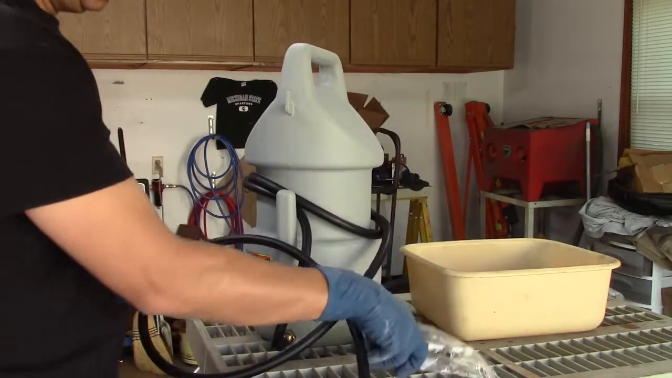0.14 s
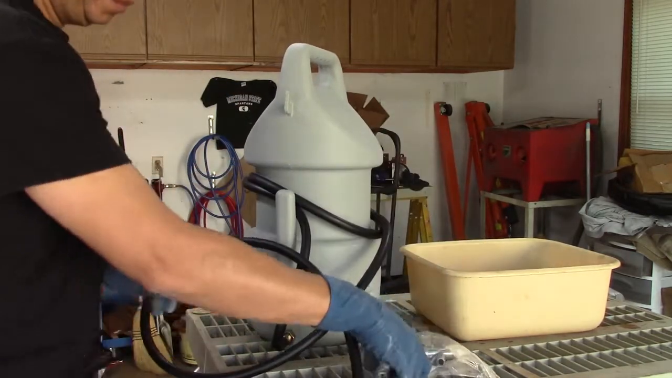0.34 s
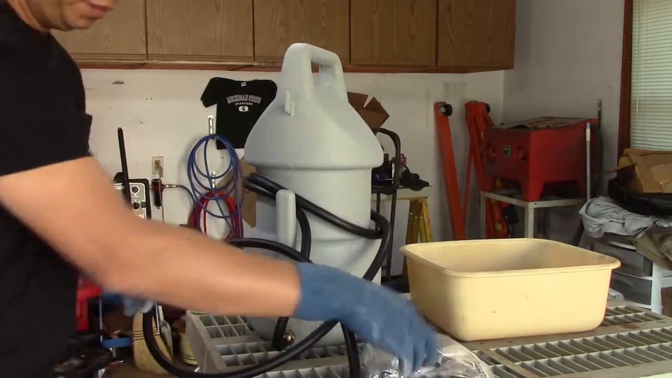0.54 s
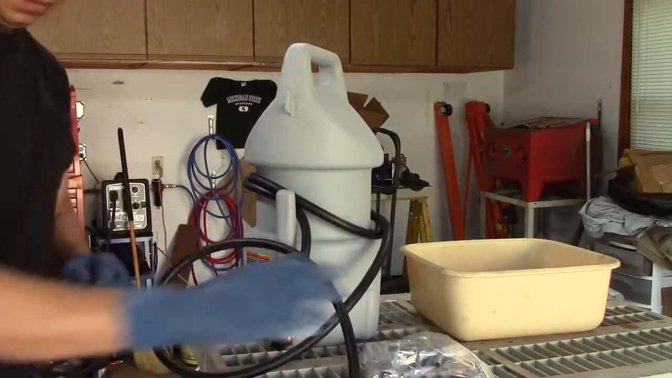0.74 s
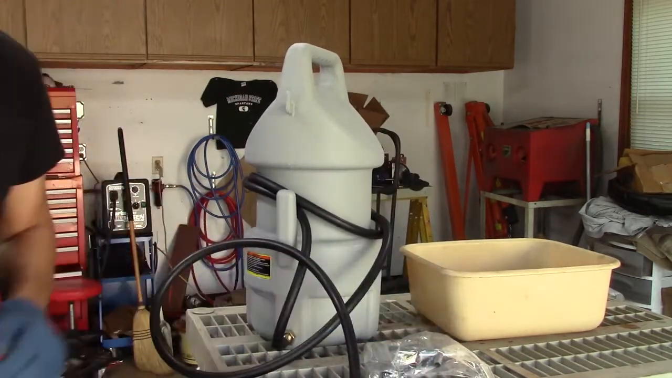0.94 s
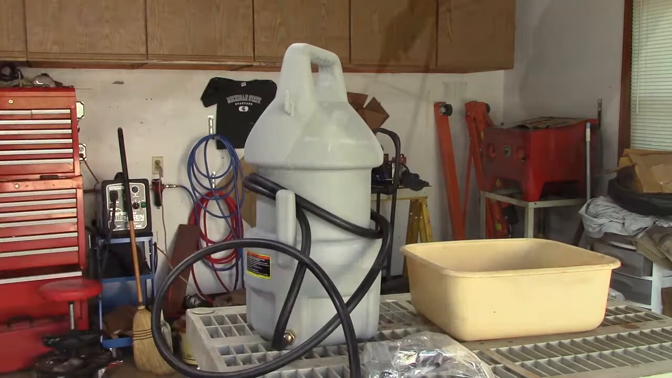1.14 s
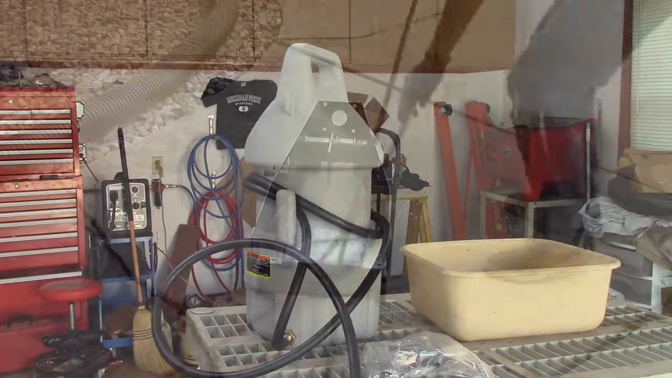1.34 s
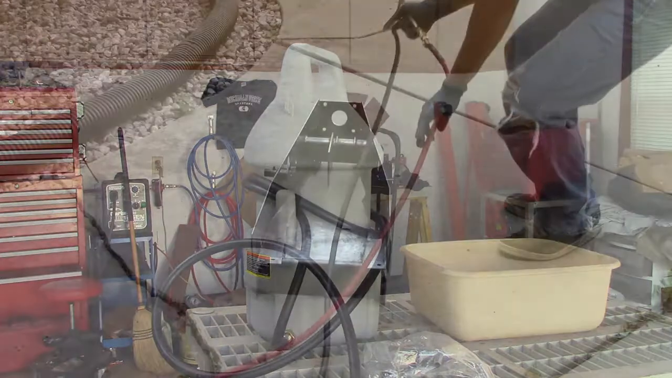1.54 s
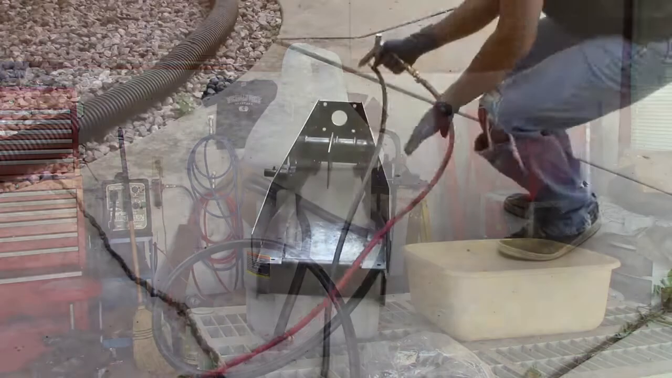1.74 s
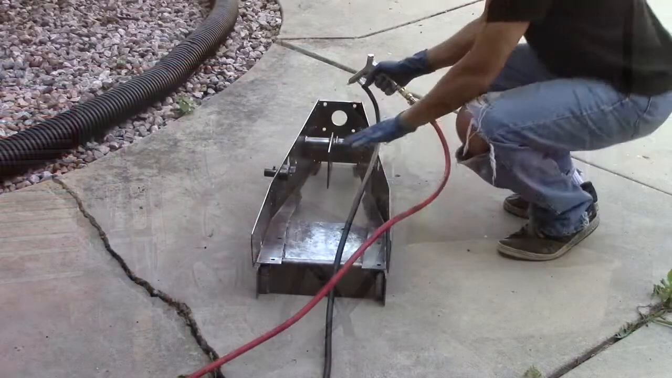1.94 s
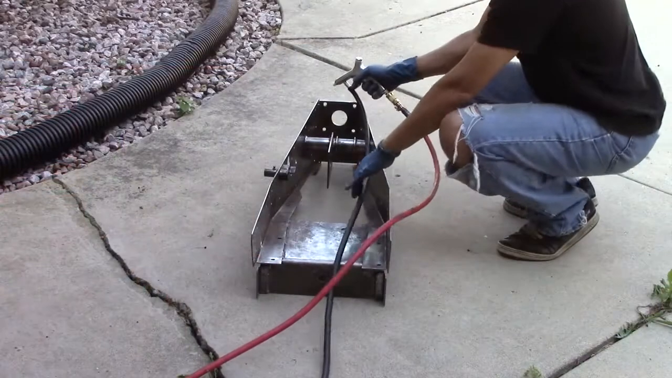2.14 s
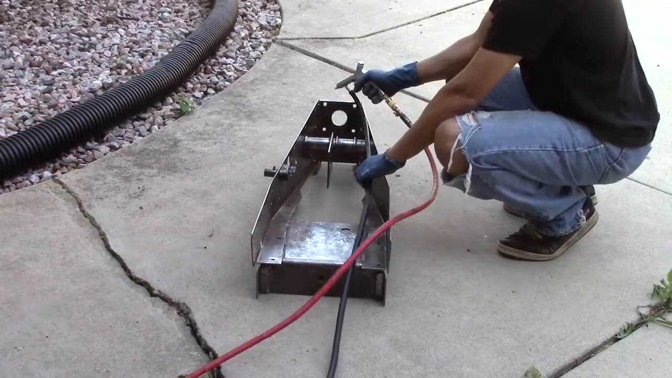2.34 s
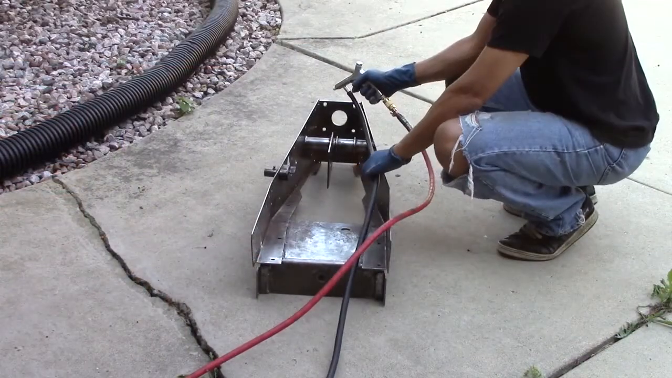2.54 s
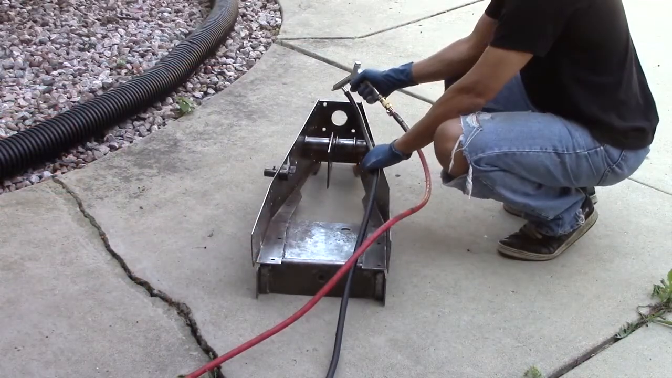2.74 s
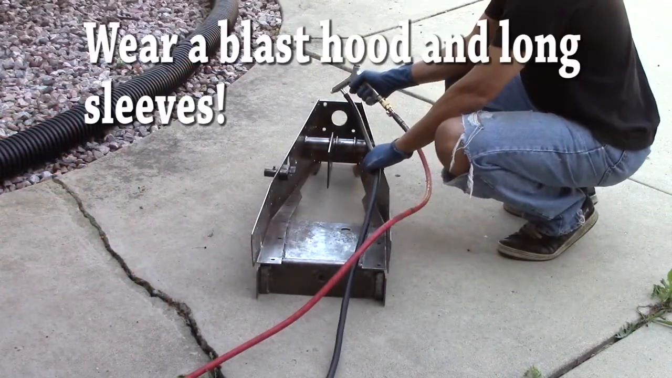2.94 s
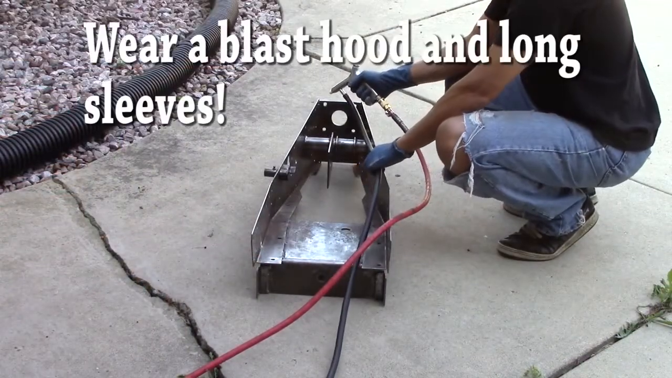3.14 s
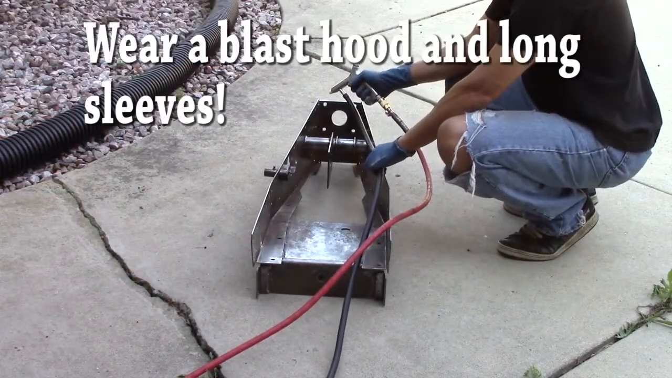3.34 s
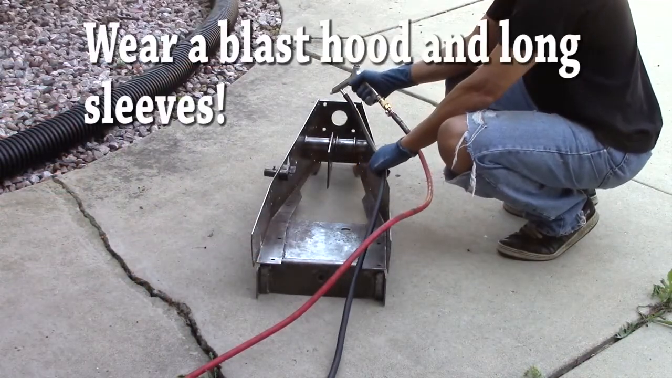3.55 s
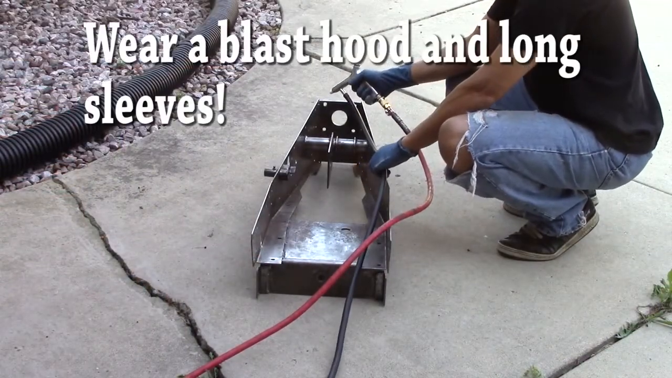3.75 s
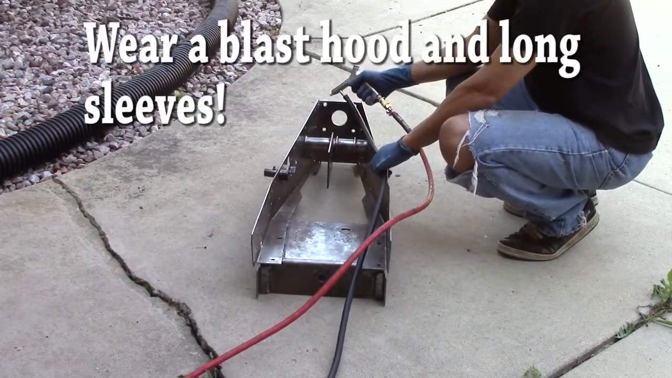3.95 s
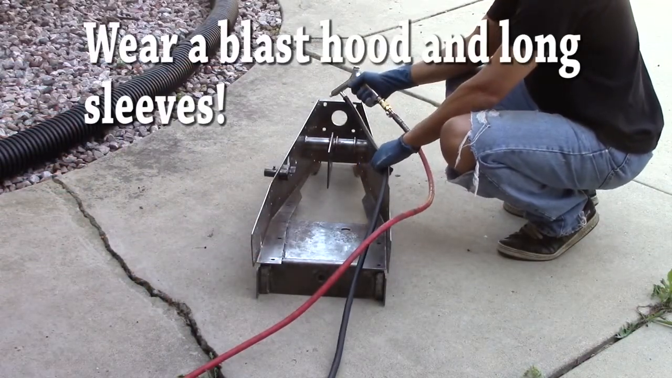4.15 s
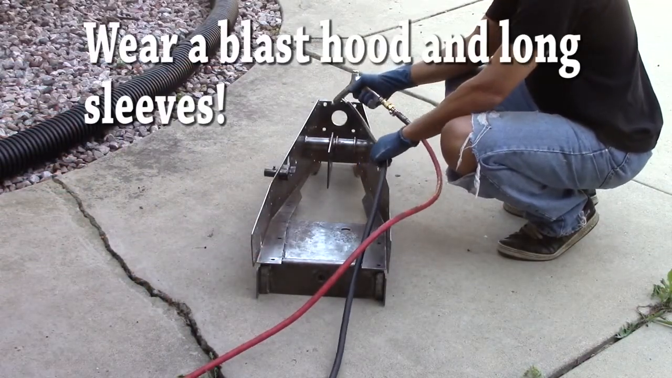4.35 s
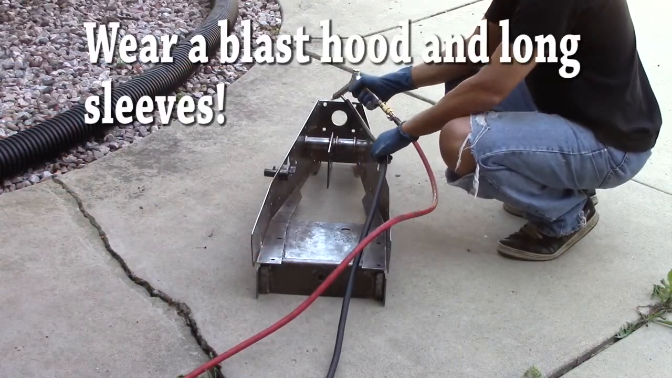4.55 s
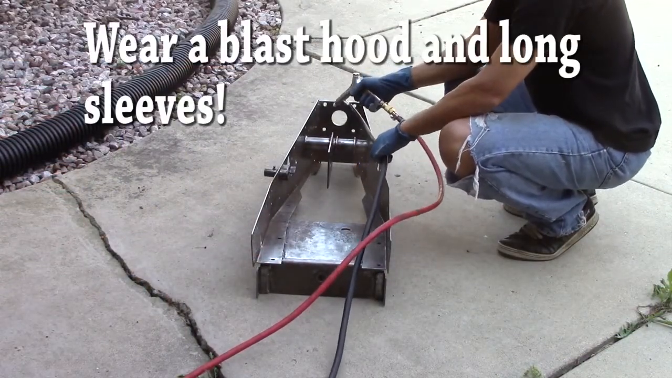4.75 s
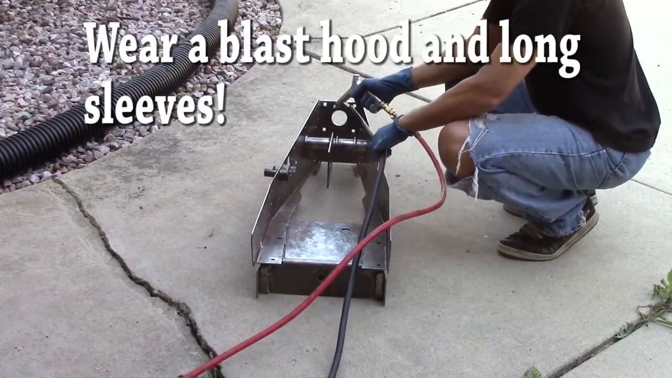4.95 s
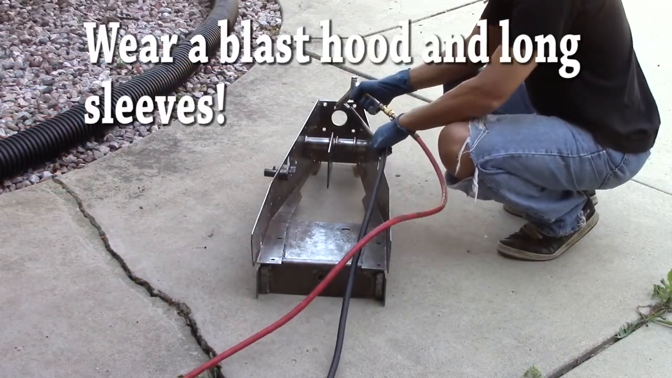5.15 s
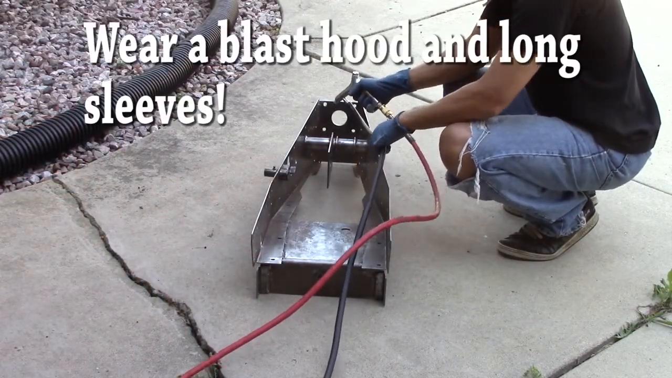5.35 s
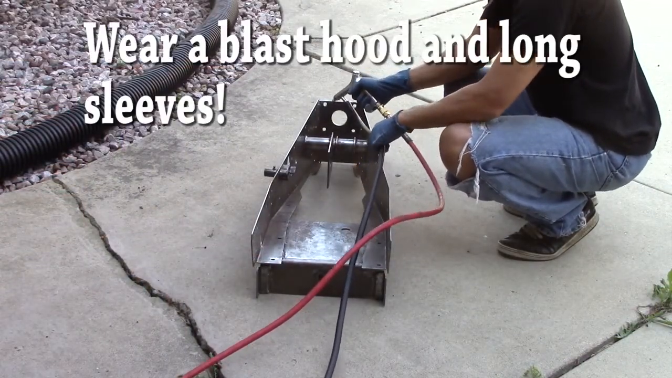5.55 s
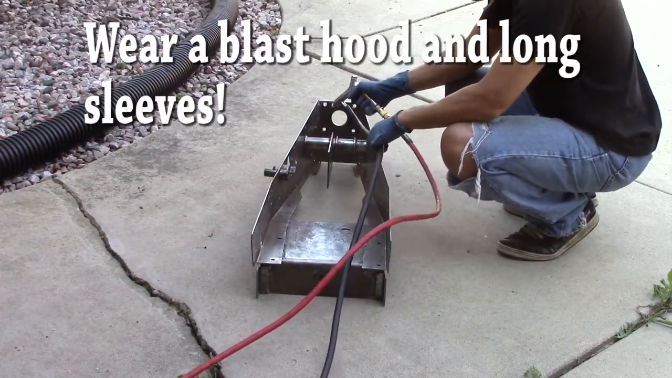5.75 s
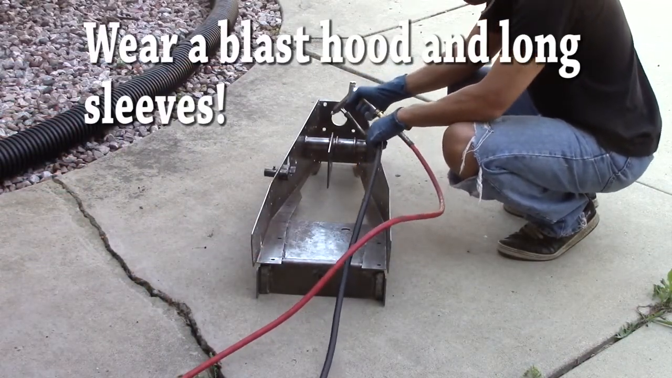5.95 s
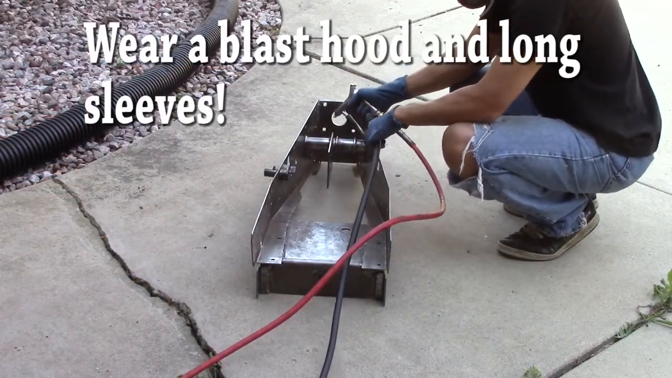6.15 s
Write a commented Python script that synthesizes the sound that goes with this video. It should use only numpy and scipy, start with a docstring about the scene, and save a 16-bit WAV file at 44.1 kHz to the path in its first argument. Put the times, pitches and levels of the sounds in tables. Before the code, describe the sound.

From 0 to 0.5 s, in a softly humming garage, a plastic bag crinkles with sharp snaps while the tool inside lands on a plastic grating: a cluster of hollow knocks at about 0.2-0.45 s, strongest near 0.27, with rattle, brief ringing and room echo. Tiny film ticks continue until about 1.4 s. Between 1.5 and 2.1 s the hum fades into quiet open air with a far motor and shrill throbbing insects. A scuff and light steel bumps ring at 1.5 s, with another clank at 2.2; a distant bird gives buzzy notes and falling pips from 1.7 to 2.8. At 3.05 s a sandblasting gun opens abruptly, loudest at first, then a strong bright hiss, dipping near 3.85. From 4 s to the end at 6.3, grit drums the steel into a rough roar beneath wandering, shrill, fluttering spray. The stereo image is nearly centred.

```python
"""A plastic bag crinkles in a humming garage and a tool in it knocks on a plastic grating: clicks set it ringing.
The room fades into a driveway with a far motor, insects and a bird, made from narrow noise and gliding sines.
A folded steel part is scuffed and bumped, so its modes ring; then a sandblasting gun opens with a hiss of noise.
As the jet sweeps over the part, the hiss gains wandering resonances and random grit clicks make the steel roar."""
import sys
import numpy as np
from scipy import signal
from scipy.fft import rfft, irfft, next_fast_len
from scipy.io import wavfile
from scipy.ndimage import map_coordinates

SR = 44100
rng = np.random.default_rng(int(sys.argv[2]) if len(sys.argv) > 2 else 0)


def materialize(psi):
    """Save the field psi as 16-bit PCM at rate SR to the path in sys.argv[1].

    A 1-D psi becomes a single channel; in a 2-D psi each row is a channel.
    """
    bounded = np.clip(np.atleast_2d(psi).T, -1, 1)
    quanta = np.round(bounded * 32767).astype(np.int16)
    wavfile.write(sys.argv[1], SR, quanta)


N = 277692
TIME = np.arange(N) / SR   # seconds

# Levels in the tables are relative: each function adds its own gain in dB.
# In spectra, level_db is the power in each Hz of pitch; only the shape counts.


def from_db(db):
    """Turn decibels into a plain multiplier."""
    return 10 ** (np.asarray(db) / 20)


def rms_one(x):
    """Scale a signal to an average strength (rms) of 1."""
    return x / np.sqrt(np.mean(x ** 2) + 1e-20)


def in_time(rows):
    """Join the points of a table with straight lines: each column at every sample."""
    times, *columns = np.transpose(rows)
    return [np.interp(TIME, times, column) for column in columns]


def coloured(x, spectrum):
    """Filter x to a spectrum with unit power gain, without sounding early (minimum phase)."""
    size = next_fast_len(len(x) + 4096)
    hz, db = np.transpose(spectrum)
    log_pitch = np.log(np.fft.rfftfreq(size, 1 / SR) + 1)
    gain = rms_one(from_db(np.interp(log_pitch, np.log(hz), db)))
    # folding the cepstrum forward in time gives the minimum phase
    cepstrum = irfft(np.log(gain), size)
    cepstrum[1:size // 2] *= 2
    cepstrum[size // 2 + 1:] = 0
    response = np.exp(rfft(cepstrum))
    return irfft(rfft(x, size) * response, size)[:len(x)]


def noise(spectrum):
    """Steady random noise with a given spectrum; rms 1."""
    return rms_one(coloured(rng.standard_normal(N), spectrum))


def low_pass(x, hz, order=2):
    """Keep the pitches below hz."""
    sections = signal.butter(order, min(hz, .45 * SR), fs=SR, output="sos")
    return signal.sosfilt(sections, x + 1e-18)


def high_pass(x, hz):
    """Keep the pitches above hz."""
    return signal.sosfilt(signal.butter(2, hz, "high", fs=SR, output="sos"), x + 1e-18)


def drift(hz):
    """Random wandering, mostly slower than hz; rms 1."""
    settled = low_pass(rng.standard_normal(N + SR), hz)[SR:]   # drop the filter's first second
    return rms_one(settled)


def resonance(hz, width_hz):
    """Turbulence ringing in one resonance, whose centre may move; rms 1."""
    phase = 2 * np.pi * np.cumsum(hz * np.ones(N)) / SR
    return rms_one(drift(width_hz / 2) * np.cos(phase) + drift(width_hz / 2) * np.sin(phase))


def ring(x, hz, t60):
    """Each unit click starts a sine of height 1 that dies by 60 dB in t60 seconds."""
    radius, angle = from_db(-60 / (t60 * SR)), 2 * np.pi * hz / SR
    return signal.lfilter([0, np.sin(angle)], [1, -2 * radius * np.cos(angle), radius * radius], x + 1e-18)


def grains(per_s, spread_db):
    """Random clicks of uneven size and either sign; rms 1."""
    sizes = from_db(spread_db * np.minimum(rng.exponential(1, N), 4))
    signed = sizes * rng.choice([-1, 1], N)
    return rms_one(signed * (rng.random(N) < per_s / SR))


def contacts(rows):
    """One short push for each blow; softer contacts are duller."""
    force = np.zeros(N)
    for start_s, level_db, brightness_hz in rows:
        at = int(start_s * SR)
        force[at:at + 512] += from_db(level_db) * low_pass(signal.unit_impulse(512), brightness_hz)
    return force


def tail(x, t60):
    """Spread x into a dense random tail that dies by 60 dB in t60 seconds; unit energy."""
    t = TIME[:SR]
    response = rng.standard_normal(SR) * from_db(-60 * t / t60)
    return signal.fftconvolve(x, response / np.linalg.norm(response))[:N]


def burst(start, length, attack, release):
    """Loudness shape: a quick rise that ends at start, a hold and an exponential release."""
    rise = np.clip((TIME - start) / attack + 1, 0, 1)
    return rise * np.exp(-np.maximum(TIME - start - length, 0) / release)


TRIGGER_S, VALVE_S = 3.051, .015   # the gun starts to open, and how long opening takes


def valve():
    """How far the gun is open, 0 to 1: slowly at first, then fast."""
    return np.clip((TIME - TRIGGER_S) / VALVE_S, 0, 1) ** 3


# spectrum of the garage air: pitch_hz, level_db
GARAGE_SPECTRUM = [(18, -38), (30, -29), (141, -1.5), (204, -6.5), (259, -2.5), (616, -13.5), (1040, -16.5),
                   (1130, -16.5), (1720, -19.5), (4420, -31), (4910, -35), (6380, -32.5), (6900, -36),
                   (7670, -31.5), (16000, -59)]
# spectrum of the open air: pitch_hz, level_db
OUTDOOR_SPECTRUM = [(30, -36), (70, -16.5), (120, -2.5), (290, -7.5), (560, -9.5), (1000, -12), (2600, -25),
                    (4400, -28), (6000, -30.5), (9000, -28), (10000, -40), (16000, -51)]
# hum of the garage: pitch_hz, width_hz, level_db
GARAGE_HUM_TONES = [(156, 10, -13.5), (258, 20, -12), (325.5, 10.7, -14)]
# a far motor, then two insect tones: pitch_hz, width_hz, level_db
MOTOR_AND_INSECTS = [(118, 17, -17), (3200, 120, -23.5), (6870, 220, -18.5)]
FADE_START_S, FADE_END_S = 1.51, 2.12   # the garage fades into the driveway
GARAGE_DB, OUTDOOR_DB = -36, -41
UNDER_BLAST_DB = -12.5   # the background sinks by this much once the gun opens


def background(insect_db=-22.5, throb_hz=3.2):
    """Garage hum gives way to open air with a far motor and shrilling insects, all random noise."""
    outside = np.interp(TIME, [FADE_START_S, FADE_END_S], [0, 1])
    garage = 0.63 * noise(GARAGE_SPECTRUM)
    garage += sum(from_db(db) * resonance(hz, width) for hz, width, db in GARAGE_HUM_TONES)
    outdoors = 0.6 * noise(OUTDOOR_SPECTRUM)
    outdoors += sum(from_db(db) * resonance(hz, width) for hz, width, db in MOTOR_AND_INSECTS)
    throb = 1 + 0.42 * np.cos(2 * np.pi * throb_hz * (TIME - 2.87))
    insects = from_db(insect_db) * resonance(8600, 550) * throb
    outdoor_level = from_db(OUTDOOR_DB + UNDER_BLAST_DB * valve())
    return (1 - outside) * from_db(GARAGE_DB) * garage + np.sqrt(outside) * outdoor_level * (outdoors + insects)


# the bag is gripped, pressed down and settles: start_s, length_s, level_db
BAG_RUSTLES = [(0.008, 0.031, -57), (0.148, 0.058, -52), (0.2, 0.074, -47), (0.306, 0.061, -48),
               (.395, 0.055, -48), (1.108, .1, -64), (1.378, .02, -56.5)]
# sharp snaps of the film: start_s, level_db
BAG_SNAPS = [(0.0144, -31), (0.1471, -26), (0.1825, -24), (0.3977, -24), (0.4532, -19), (0.4934, -27),
             (0.7896, -31), (0.9213, -31), (1.0375, -33)]
# spectrum of the plastic film: pitch_hz, level_db
BAG_SPECTRUM = [(800, -5), (2500, 9), (4500, 2.5), (6700, 5), (10000, 0.5), (15500, -12)]
RUSTLE_ATTACK_S, RUSTLE_RELEASE_S = .006, 0.034


def bag(crinkle_db=3.0, snap_db=0.0):
    """Creases of plastic film buckle: fine crinkle and a few sharp snaps."""
    handling = sum(from_db(db + crinkle_db) * burst(start, length, RUSTLE_ATTACK_S, RUSTLE_RELEASE_S)
                   for start, length, db in BAG_RUSTLES)
    crinkle = grains(per_s=1300, spread_db=2.5) * handling
    snaps = from_db(snap_db) * contacts([(start, db, 14000) for start, db in BAG_SNAPS])
    film = coloured(crinkle + snaps + 1.7 * tail(snaps, t60=0.028), BAG_SPECTRUM)
    return film + .5 * tail(film, t60=0.23)


# the tool landing on the grating: start_s, level_db, brightness_hz of the contact
TOOL_KNOCKS = [(.2090, -13.5, 7000), (.2135, -22.5, 7000), (.231, -21.5, 5000), (.2692, -8, 1160),
               (.2695, -21, 6000), (.294, -17.5, 2020), (.316, -22, 900), (.336, -38, 800),
               (.400, -36, 7000), (.425, -26, 4000)]
# spectrum of the knocks: pitch_hz, level_db
KNOCK_SPECTRUM = [(35, -48), (90, -36), (170, -2), (440, 3), (850, 4), (1400, 0.5), (1950, -4.5),
                  (2600, -13), (4200, -9.5), (5900, -4), (7200, -17), (15000, -25)]
# ringing modes of the grating: pitch_hz, level_db, ring_s to die by 60 dB (before a cap of 0.6 s)
GRATING_MODES = [(167, 5.5, 0.3), (284.4, -8, 2.2), (473, -8, 1.1), (556, -9, 0.68), (656, -22, 0.33),
                 (726, -9, 0.29), (726, -18, 0.59), (818, -21, 0.38), (893, -28, 0.41), (1110, -11, 0.11),
                 (1174, -22, 0.66), (1440, -19, 0.23), (1700, -30, 0.31), (1660, -27, 0.97)]
DIRECT_DB = 11.5


def tool_set_down(rattle_db=21.0, modes_db=-15.0, room_db=23.5):
    """The tool lands and rocks; the bars rattle, the grating rings and the garage answers."""
    force = contacts(TOOL_KNOCKS)
    crack = coloured(force, KNOCK_SPECTRUM)
    rattle = from_db(rattle_db) * tail(crack, t60=0.038)
    modes = sum(from_db(db) * ring(force, hz, min(ring_s, .6)) for hz, db, ring_s in GRATING_MODES)
    body = from_db(modes_db) * high_pass(modes, hz=113)   # an open grating radiates little bass
    garage = from_db(room_db) * low_pass(tail(crack, t60=.48), 3500, order=1)
    return from_db(DIRECT_DB) * crack + rattle + body + garage


# spectrum of the scuff: pitch_hz, level_db
SCUFF_SPECTRUM = [(800, -6), (2500, 5), (4500, 3), (7000, 1), (11000, 0), (15500, -5)]
SCUFF_S, SCUFF_LENGTH_S, SCUFF_DB = 1.516, 0.03, -45


def scuff():
    """The first bump drags briefly over the steel: a burst of gritty clicks."""
    slide = burst(SCUFF_S, SCUFF_LENGTH_S, attack=.012, release=.008)
    return from_db(SCUFF_DB) * coloured(grains(per_s=5000, spread_db=2.5) * slide, SCUFF_SPECTRUM)


# bumps: start_s, level_db, brightness_hz of the clatter, favoured_hz (pitch the struck spot favours)
STEEL_BUMPS = [(1.509, -39, 3000, 700), (1.527, -38, 3400, 700), (1.545, -42, 3400, 470),
               (1.785, -50, 600, 600), (2.215, -36, 2600, 1080)]
# spectrum of the clatter: pitch_hz, level_db
CLATTER_SPECTRUM = [(150, -21), (450, -6), (750, 1), (1300, 1), (2400, -1), (4000, -2), (7000, -29)]
# ringing modes of the part, also played by the grit:
# pitch_hz, grit_level_db, bump_level_db, ring_s to die by 60 dB when bumped
STEEL_MODES = [(420.0, -7.0, -20, 0.6), (463.0, -12.0, -10, 1.3), (543.0, -3.0, -7, 1.9),
               (564.0, -1.0, -18, 0.6), (614.0, -4.0, -9, 0.8), (652.0, -3.0, -12, 0.5),
               (762.0, -1.0, -6, 0.9), (795.0, -1.0, -10, 0.6), (847.0, 0.0, -16, 0.5),
               (892.0, -3.0, -15, 0.4), (915.0, -3.0, -13, 1.3), (957.0, -1.0, -23, 0.5),
               (1082.0, -4.0, -11, 0.7), (1114.0, -2.0, -7, 1.1), (1192.0, -6.0, -13, 0.9),
               (1275.0, -2.0, -21, 0.4), (1343.0, -3.0, -17, 0.7), (1437.0, -2.0, -24, 0.4),
               (1507.0, -1.0, -26, 0.4), (1561.0, -2.0, -16, 0.4), (1595.0, -1.0, -14, 0.6),
               (1675.0, -3.0, -20, 0.4), (1846.0, -2.0, -21, 0.4), (1992.0, -10.0, -19, 0.5),
               (2120.0, -8.0, -32, 0.4), (2281.0, -4.0, -23, 0.4), (2342.0, -7.0, -13, 0.45),
               (2412.0, -6.0, -23, 0.35), (2595.0, -5.0, -21, 0.35), (2848.0, -5.0, -21, 0.3)]
CLATTER_DB, CLATTER_T60_S, BUMP_MODES_DB = 28.5, .5, 2
SPOT_DB_PER_OCTAVE = 2   # modes lose this much per octave away from the favoured pitch


def steel_bumps():
    """Light knocks leave the steel ringing: clear low modes over a wash of crowded ones."""
    knocks = contacts([row[:3] for row in STEEL_BUMPS])
    clatter = tail(coloured(knocks, CLATTER_SPECTRUM), t60=CLATTER_T60_S)
    times, blow_db, _, favoured_hz = np.transpose(STEEL_BUMPS)
    modes = np.zeros(N)
    for hz, _, db, ring_s in STEEL_MODES:
        # each blow lands on another spot, so it drives each mode with its own strength and sign
        octaves_away = np.abs(np.log2(hz / favoured_hz))
        spot_db = rng.normal(0, 2.2, len(times)) - SPOT_DB_PER_OCTAVE * octaves_away
        signs = rng.choice([-1, 1], len(times))
        force = np.zeros(N)
        force[(times * SR).astype(int)] = signs * from_db(blow_db + db + spot_db)
        modes += ring(force, hz, ring_s)
    return from_db(BUMP_MODES_DB) * modes + from_db(CLATTER_DB) * clatter


def note(start, length, hz, glide_hz, vibrato_hz):
    """One whistle that swells and fades while its pitch glides by glide_hz in all."""
    progress = np.clip((TIME - start) / length, 0, 1)
    pitch_hz = hz + glide_hz * (progress - .5) + vibrato_hz
    return np.sin(np.pi * progress) * np.sin(2 * np.pi * np.cumsum(pitch_hz) / SR)


# the long buzzy notes: start_s, length_s, level_db
BUZZY_NOTES = [(1.705, 0.316, -51), (2.426, 0.307, -51)]
# groups of three pips: start_s, level_db
PIP_TRIPLETS = [(1.877, -53), (2.265, -51.5), (2.673, -50.5)]
# the pips of every triplet: delay_s, pitch_hz, level_db
TRIPLET_PIPS = [(0, 4870, -5), (.029, 4970, 3), (.070, 5000, 3)]
BUZZ_HZ, BUZZ_RISE_HZ = 4050, 78.5
PIP_S, PIP_FALL_HZ = 0.023, 280


def bird(buzz_hz=72.0, swing_hz=110.0, waver_db=2.5, echo=0.71):
    """A distant bird: buzzy notes and triplets of falling pips, blurred by the yard."""
    buzz = np.sin(2 * np.pi * np.cumsum(buzz_hz * (1 + 0.258 * drift(32.7))) / SR)
    waver = from_db(waver_db * drift(40)) * (1 + .5 * buzz)
    song = waver * sum(from_db(db) * note(start, length, BUZZ_HZ, BUZZ_RISE_HZ, swing_hz * buzz)
                       for start, length, db in BUZZY_NOTES)
    song += sum(from_db(db + pip_db) * note(start + delay, PIP_S, hz, -PIP_FALL_HZ, 0)
                for start, db in PIP_TRIPLETS for delay, hz, pip_db in TRIPLET_PIPS)
    return song + echo * tail(song, t60=0.44)


# spectrum of the free jet: pitch_hz, level_db
JET_SPECTRUM = [(50, -45), (150, -37), (300, -16.5), (600, -9), (1030, -22), (1600, -14), (2100, -2),
                (3200, -1.5), (4300, -1.5), (7000, 2), (9300, 3.5), (10200, -2), (12200, 0), (14300, -12.5),
                (15700, -15)]
# resonances of the gun and its nozzle: pitch_hz, width_hz, level_db
NOZZLE_RESONANCES = [(1343, 160, -18), (1995, 330, -9), (2270, 110, -9.5), (2883, 440, -6.5),
                     (3158, 310, -5.5), (3544, 330, -3), (4000, 160, -11), (4425, 270, -8.5),
                     (5195, 260, -9), (5830, 390, -14), (6910, 250, -12.5), (7140, 280, -24),
                     (8910, 1000, 1.5), (9550, 140, -7.5), (10980, 780, -5), (12400, 330, -23),
                     (13100, 370, -11)]


def free_jet(hiss_db=5.5, nozzle_db=-1.0):
    """Turbulent air, coloured by the resonances of the gun."""
    hiss = from_db(hiss_db) * noise(JET_SPECTRUM)
    nozzle = sum(from_db(db) * resonance(hz, width) for hz, width, db in NOZZLE_RESONANCES)
    return hiss + from_db(nozzle_db) * nozzle


# spectrum of the broad roar: pitch_hz, level_db
ROAR_SPECTRUM = [(20, -46), (40, -49), (150, -18.5), (300, -9.5), (560, 2.5), (690, 0), (820, -0.5),
                 (1040, 0), (1600, 2.5), (1950, -2.5), (2800, -2), (3500, -7.5), (7000, -11.5)]
GRIT_DAMPING = .45   # under grit, the modes ring for this share of their ring_s


def grit_on_steel(modes_db=-3.0, roar_db=0.0):
    """Thousands of grains a second drum on the part, whose modes stand out of a broad roar."""
    modes = sum(from_db(db) * rms_one(ring(grains(per_s=6000, spread_db=3.0), hz, GRIT_DAMPING * ring_s))
                for hz, db, _, ring_s in STEEL_MODES)
    radiated = rms_one(high_pass(modes, hz=260))   # the ringing modes are kept above 260 Hz
    roar = coloured(grains(per_s=14000, spread_db=3.5), ROAR_SPECTRUM)
    return from_db(modes_db) * radiated + from_db(roar_db) * roar


# main resonance of the air gap between nozzle and steel, lower as the gap opens: time_s, pitch_hz
GAP_PITCH_CURVE = [(4.0, 8890), (4.24, 8480), (4.33, 8110), (5.19, 8990), (5.29, 8230), (5.46, 8710),
                   (5.69, 8340), (6.13, 9180), (6.3, 8200)]
# the whistling upper resonance: time_s, level_db
WHISTLE_CURVE = [(4.1, -29), (4.28, -25), (4.31, -18.5), (4.57, -22.5), (4.76, -20.5), (4.93, -32),
                 (5.48, -20.5), (5.59, -25), (5.78, -21), (5.81, -27), (6.3, -30)]
# the shrill top, which a rasp in the middle follows: time_s, level_db
SHRILL_CURVE = [(4.0, -28), (4.08, -30), (4.22, -21.5), (4.38, -31), (4.43, -34), (4.57, -45),
                (4.67, -29.5), (5.25, -24.5), (5.34, -46), (5.51, -25), (5.62, -37), (5.85, -19),
                (6.03, -27), (6.3, -31)]
WHISTLE_HZ, SHRILL_HZ, RASP_HZ = 11060, 13450, 2332


def gap_tones(hiss_db, main_db=-4.0, whistle_db=-1.0, shrill_db=-0.5, rasp_db=-3.0, wander_hz=131.2):
    """Broad resonances that wander and swell as the nozzle moves along the steel."""
    (gap_hz,) = in_time(GAP_PITCH_CURVE)
    (whistle_level,) = in_time(WHISTLE_CURVE)
    (shrill_level,) = in_time(SHRILL_CURVE)
    wander = wander_hz * drift(3)
    main = from_db(hiss_db + main_db) * resonance(gap_hz, 1330)
    whistle = from_db(whistle_level + whistle_db) * resonance(WHISTLE_HZ + wander, 820)
    shrill = from_db(shrill_db) * resonance(SHRILL_HZ + wander, 750)
    rasp = from_db(rasp_db) * resonance(RASP_HZ, 840)
    return main + whistle + from_db(shrill_level) * (shrill + rasp)


# the bounce off the concrete shifts as the hand sways
GROUND_ECHO_S, ECHO_SWAY_S, SWAY_HZ, GROUND_SHARE = .0011, .00012, 1.43, 0.26


def over_concrete(x):
    """Direct sound plus one ground bounce: a comb of peaks that sweeps as the nozzle sways."""
    lag = (GROUND_ECHO_S + ECHO_SWAY_S * drift(SWAY_HZ)) * SR   # in samples
    bounce = map_coordinates(x, [np.arange(N) - lag], order=3)
    return (x + GROUND_SHARE * bounce) / np.hypot(1, GROUND_SHARE)


# the hiss, which changes as the gun is turned: time_s, level_db
HISS_CURVE = [(3.1, -13), (3.12, -13.5), (3.41, -14), (3.85, -19.5), (4.2, -14.5), (4.3, -14), (4.92, -13),
              (5.13, -14.5), (5.16, -15.5), (5.89, -16), (6.29, -19.5), (6.3, -19)]
# the grit striking the steel: time_s, level_db
GRIT_CURVE = [(3.1, -36.5), (3.59, -30.5), (3.88, -33), (4.03, -23), (4.37, -20.5), (4.44, -22),
              (4.98, -18.5), (5.7, -21), (6.3, -18.5)]
# spectrum of the spray thrown off the steel: pitch_hz, level_db
SPRAY_SPECTRUM = [(1500, -46), (2600, -16), (3600, -4.5), (5500, -2), (6100, 6), (6700, 3), (7300, 5),
                  (9000, 1), (11000, 6), (12600, 0.5), (13600, -1), (14400, -30), (15700, -9)]
LOUD_START_DB, SETTLE_S = 3.8, .018   # the level overshoots as the gun opens, and how fast it settles
GRAZING_DB, FULL_HIT_DB = -26.0, -21   # grit level where the jet first touches, and where all of it lands
# free jet: level, share of the hiss's swing, loss when all of it lands
JET_DB, JET_FOLLOWS, JET_BLOCKED_DB = -10, 0.72, 12.5
RIM_HZ, RIM_WIDTH_HZ, RIM_DB = 2360, 750, -28   # the jet tears on the rim while only partly on the steel


def sandblaster(spray_db=-2.5, grit_db=0.0, flutter_db=0.42):
    """The level overshoots by a few dB as the gun opens and settles within hundredths of a second; uneven grit
    feed flutters it, and the more of the jet lands on steel, the more its free hiss turns into spray."""
    (hiss_level,) = in_time(HISS_CURVE)
    (grit_level,) = in_time(GRIT_CURVE)
    # share of the jet that lands on the part, 0 to 1
    landing = np.clip((grit_level - GRAZING_DB) / (FULL_HIT_DB - GRAZING_DB), 0, 1)
    since = np.maximum(TIME - TRIGGER_S, 0)
    loud_start_db = LOUD_START_DB * np.exp(-since / SETTLE_S)
    blast_level = valve() * from_db(loud_start_db + flutter_db * drift(35))
    jet = from_db(JET_DB + JET_FOLLOWS * hiss_level - JET_BLOCKED_DB * landing ** 2) * free_jet()
    spray = from_db(hiss_level + spray_db) * noise(SPRAY_SPECTRUM)
    deflected = landing * over_concrete(spray + gap_tones(hiss_level))
    rim = from_db(RIM_DB) * np.sin(np.pi * landing) * resonance(RIM_HZ, RIM_WIDTH_HZ)
    grit = from_db(grit_level + grit_db) * grit_on_steel()
    return blast_level * (jet + rim + deflected + grit)


# spectrum of the left-right difference made from the steel and blast sounds: pitch_hz, level_db
SIDE_SPECTRUM = [(60, -12), (250, -32), (1000, 5.5), (2800, -28), (4200, 7.5), (6000, 16.5), (9000, 14.5),
                 (11000, -12), (16000, -27)]


def scene(width_db=-30.5, garage_width_db=-30.0, diffuse_db=-15.5):
    """All sources are centred; a faint diffuse noise made from each widens the stereo."""
    around = background() + bird()
    indoors = bag() + tool_set_down()
    work = scuff() + steel_bumps() + sandblaster()
    side = from_db(width_db) * coloured(tail(work, t60=0.11), SIDE_SPECTRUM)
    garage_side = from_db(garage_width_db) * tail(indoors, t60=0.11)
    around_side = from_db(diffuse_db) * tail(around, t60=0.061)
    side += high_pass(garage_side + around_side, hz=227)
    mid = indoors + work + around
    return np.array([mid + side, mid - side])


CUTOFF_HZ = 15700


def record(dry):
    """The highest peaks are clipped, then the treble above the cutoff is removed."""
    clipped = np.clip(dry, -.92, .92)
    return signal.sosfilt(signal.ellip(10, .1, 100, CUTOFF_HZ, fs=SR, output="sos"), clipped)


dry = scene()
out = record(dry)
materialize(out)
```